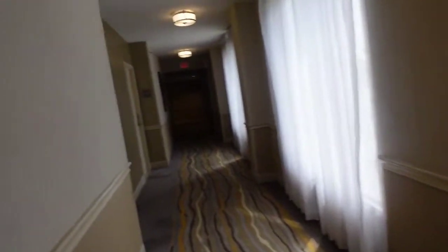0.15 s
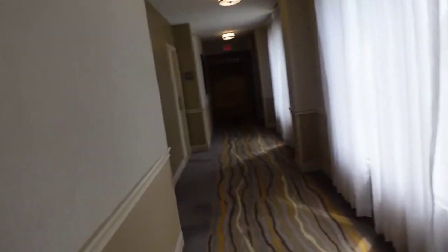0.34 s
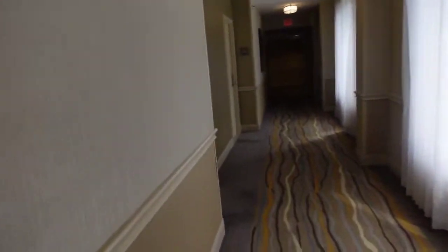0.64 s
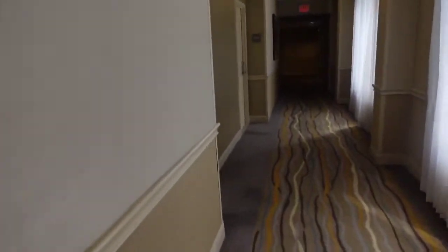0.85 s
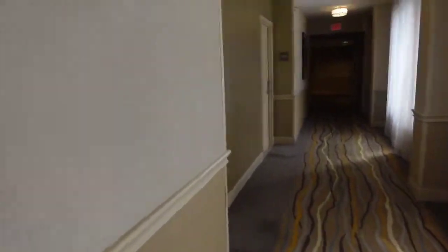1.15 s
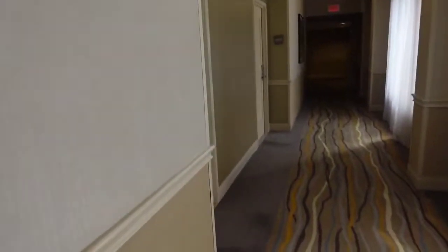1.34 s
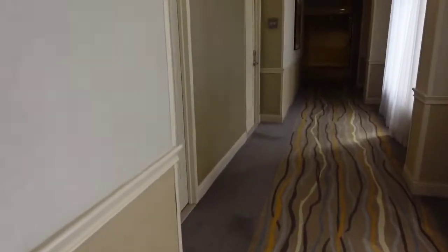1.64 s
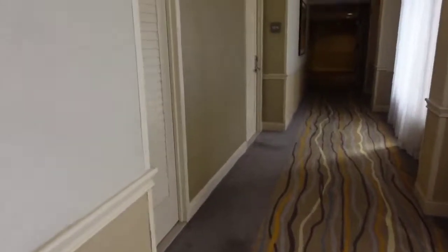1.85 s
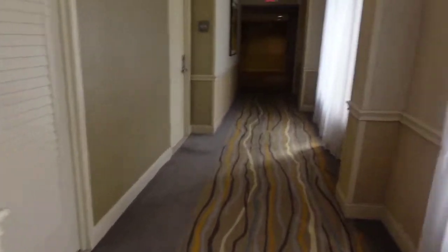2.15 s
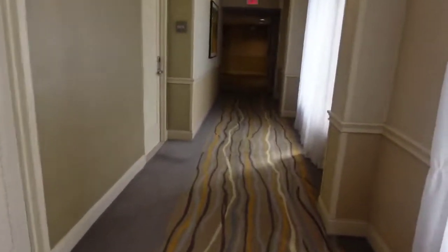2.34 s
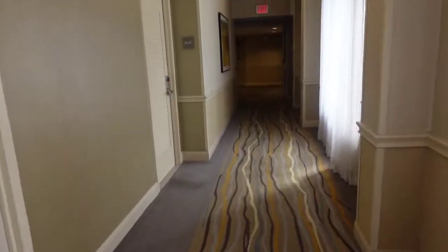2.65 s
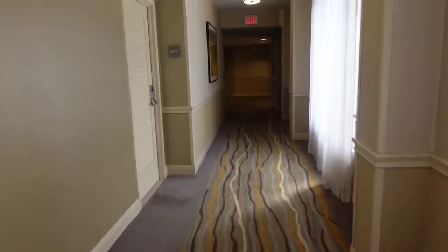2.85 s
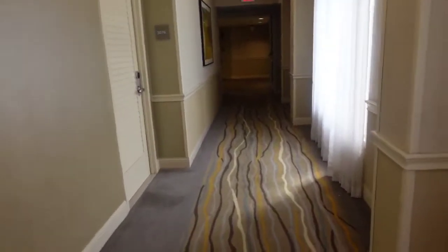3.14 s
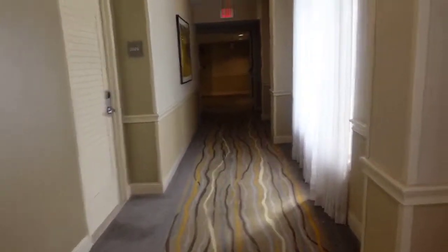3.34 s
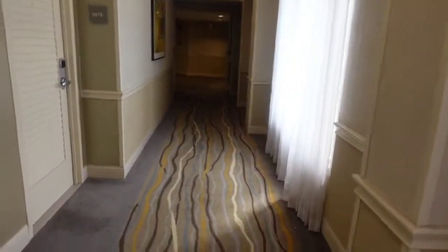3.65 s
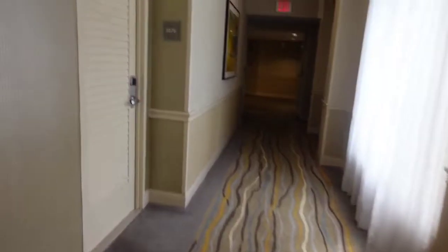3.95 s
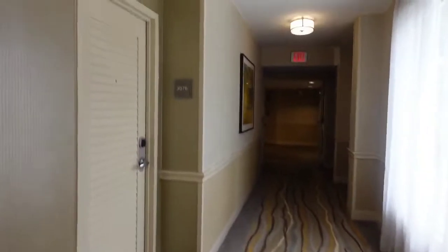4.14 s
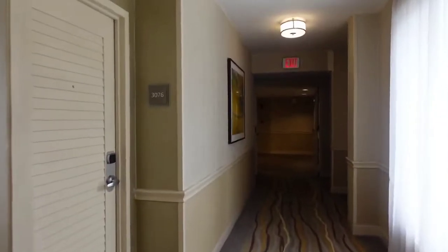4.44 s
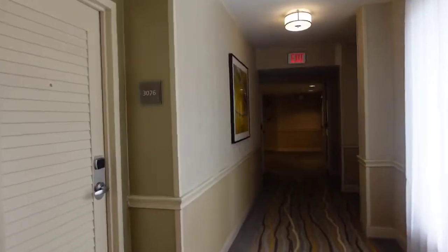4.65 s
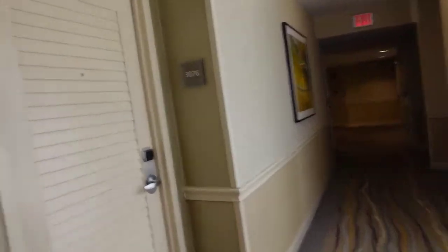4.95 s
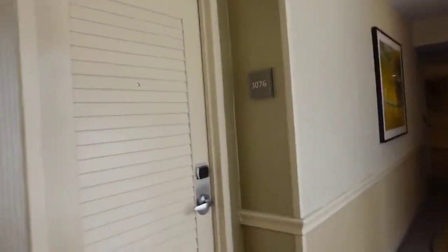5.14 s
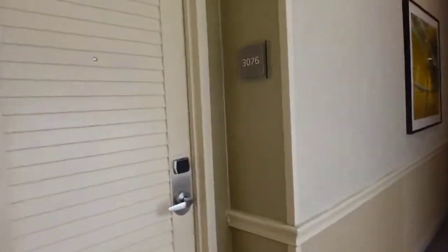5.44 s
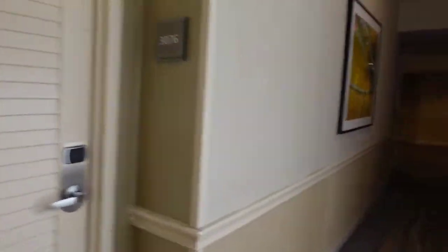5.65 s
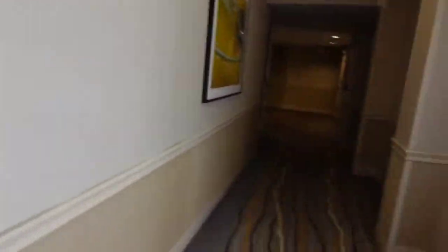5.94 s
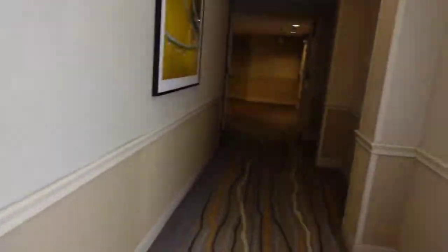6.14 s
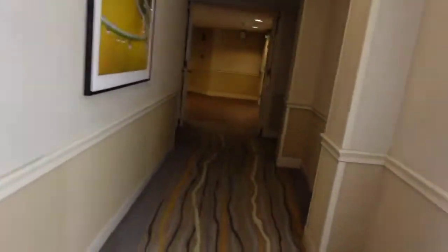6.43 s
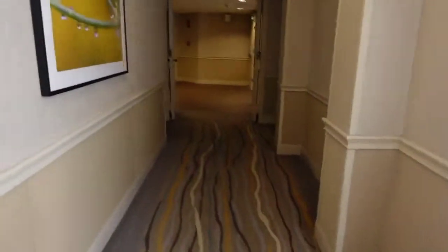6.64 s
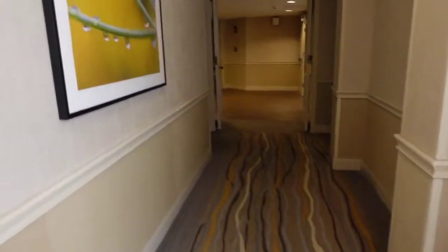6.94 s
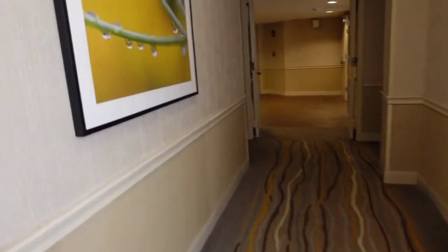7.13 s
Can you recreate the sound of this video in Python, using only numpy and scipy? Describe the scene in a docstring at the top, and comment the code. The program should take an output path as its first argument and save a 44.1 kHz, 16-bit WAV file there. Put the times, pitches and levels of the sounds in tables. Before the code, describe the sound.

Loose sandals slap at a steady walk along a carpeted corridor, with trousers swishing over a soft hiss of air.

```python
"""A carpeted corridor, along which someone walks in loose sandals, a little over two steps a second.
Each sole strikes the heel in a few quick impacts; air cavities under the foot resonate with them
and the bare walls reverberate. Straps click; there are soft low thuds and one faint handling rumble.
Between steps, friction makes noise as the other leg swings: trousers swish, the sole brushes the pile.
A soft, steady hiss of air lies beneath. The sound is close and mono."""
import sys
import numpy as np
from scipy import signal
from scipy.fft import rfft, irfft, next_fast_len
from scipy.io import wavfile
from scipy.ndimage import uniform_filter1d, map_coordinates

SR = 44100
rng = np.random.default_rng(int(sys.argv[2]) if len(sys.argv) > 2 else 0)


def transcribe(u):
    """Save the signal u as a 16-bit wav file named by the first command-line argument.

    u: samples, shape (n,) or (channels, n), limited to [-1, 1]; the rate is SR.
    q: integer samples, one column per channel.
    """
    v = np.clip(np.atleast_2d(u).T, -1, 1)
    q = np.round(v * 32767).astype(np.int16)
    wavfile.write(sys.argv[1], SR, q)


N = 321474


def amp(db):
    """Amplitude ratio of a level in decibels."""
    return 10 ** (np.asarray(db) / 20)


def unit(x):
    """Normalisation to an rms of 1."""
    return x / np.sqrt(np.mean(x ** 2) + 1e-20)


def along(points, hz):
    """Interpolation of (f/Hz, value) points on a log-frequency axis."""
    f, values = np.transpose(points)
    return np.interp(np.log(hz + 1), np.log(f), values)


def bell(hz, centre, octaves):
    """Gaussian of height 1 in log frequency, with standard deviation octaves."""
    return np.exp(-.5 * (np.log2((hz + 1) / centre) / octaves) ** 2)


def wobble(rate):
    """Smooth random modulation, rate knots a second."""
    knots = rng.standard_normal(int(N * rate / SR) + 4)
    return map_coordinates(knots, [np.arange(N) * rate / SR])


def coloured(x, level):
    """Minimum-phase filtering of x with a gain in dB of level(f/Hz)."""
    m = 2 * next_fast_len(len(x))
    cepstrum = irfft(np.log(amp(level(np.fft.rfftfreq(m, 1 / SR))) + 1e-6))
    cepstrum[1:m // 2] *= 2
    cepstrum[m // 2 + 1:] = 0
    return irfft(rfft(x, m) * np.exp(rfft(cepstrum)))[:len(x)]


def add(track, start, sound):
    """Superposition of a sound on the track from start/s on."""
    part = track[round(start * SR):][:len(sound)]
    part += sound[:len(part)]


# Spectrum of the hiss: f/Hz, relative level/dB
AIR_SPECTRUM = [(25, -35), (100, -22), (250, -10), (400, -4.5), (750, -5), (1300, 1), (2100, -8.5),
                (3200, -8), (5500, -10), (8000, -11), (15000, -17.5)]

def air(db):
    """Stationary broadband noise: ventilation and microphone hiss."""
    return amp(db) * unit(coloured(rng.standard_normal(N), lambda hz: along(AIR_SPECTRUM, hz)))


def friction(spectrum, grain_db, grain_rate):
    """Stick-slip friction: fibres catch and let go in a hiss of uneven grains, rms 1."""
    grains = rng.standard_normal(N) * amp(grain_db * wobble(grain_rate))
    return unit(coloured(grains, lambda hz: along(spectrum, hz)))


# Spectra of sole on pile and of cloth on cloth: f/Hz, relative level/dB
BRUSH_SPECTRUM = [(60, -49), (150, -18), (260, -9), (380, -12.5), (650, -6), (950, 0), (1300, 4),
                  (1700, -1.5), (2500, -13), (8000, -70)]
CLOTH_SPECTRUM = [(500, -23), (1300, -8.5), (1800, 3), (2500, 2.5), (3600, 0), (5500, 0.5), (8000, -4.5),
                  (12000, -9), (15000, -10.5)]
# Rustle of clothes that never quite come to rest: t/s, relative level/dB
CLOTHES_RUSTLE = [(0, -59.5), (.4, -58), (.95, -62), (2.3, -61), (3, -58.5), (4.3, -58.5), (4.8, -57.5),
                  (5.75, -55.5), (6.05, -56), (6.55, -62.5), (7.2, -52.5)]
# Swings of the leg: start t/s, relative swish level/dB, relative brush level/dB
LEG_SWINGS = [(0, -64, -62.5), (.2, -57.5, -69), (.47, -68, -59.5), (1.015, -56, -70), (1.53, -64, -89),
              (1.87, -56.5, -79), (2.4, -52, -64), (2.86, -58.5, -67), (3.27, -59.5, -61.5),
              (3.755, -57, -74), (4.19, -69, -82), (4.643, -50.5, -56.5), (5.144, -52.5, -59),
              (5.52, -63, -67), (6.099, -53, -57), (6.65, -57.5, -60), (7.06, -55.5, -61.5)]

def leg_swings(gain_db, uneven_db):
    """Sliding friction: the trouser legs catch, slide and part while the sole brushes the pile."""
    attack_s, hold_s, fade_db_per_s = 0.016, 0.054, 46
    t = np.arange(SR) / SR
    stroke = np.minimum(t / attack_s, 1) * amp(-fade_db_per_s * np.maximum(t - attack_s - hold_s, 0))
    swish, brush = np.zeros(N), np.zeros(N)
    for start, swish_db, brush_db in LEG_SWINGS:
        add(swish, start, amp(swish_db) * stroke)
        add(brush, start, amp(brush_db) * stroke)
    rustle = amp(np.interp(np.arange(N) / SR, *np.transpose(CLOTHES_RUSTLE)))
    cloth = np.hypot(swish, rustle) * amp(uneven_db * wobble(30))  # incoherent sources add in power
    pile = brush * friction(BRUSH_SPECTRUM, grain_db=1.5, grain_rate=120)
    trousers = cloth * friction(CLOTH_SPECTRUM, grain_db=0.9, grain_rate=600)
    return amp(gain_db) * (pile + trousers)


# Reverberation time of the corridor: f/Hz, T60/s
CORRIDOR_T60 = [(150, 0.81), (300, 0.95), (1300, 0.76), (5000, 0.51), (12000, 0.38)]

def reverberation(build_s, liveness=1):
    """Dense wall reflections build up, then decay exponentially, the treble first."""
    hz, t, spectra = signal.stft(rng.standard_normal(SR), SR, nperseg=256)
    t60 = liveness * along(CORRIDOR_T60, hz)[:, None]
    tail = signal.istft(spectra * amp(-60 * t / t60), SR)[1][:SR]
    return tail * (1 - np.exp(-np.arange(SR) / SR / build_s))


# Ticks, rebounds and knocks: t/s, level/dB, centre f/Hz, half the bell's deviation/octaves, T60/s
SANDAL_TICKS = [(.204, -43, 1730, .8, .05), (0.3221, -39.5, 4000, 2.1, .03), (.683, -42, 5200, .3, .023),
                (0.772, -37.5, 3180, 2.8, 0.021), (0.793, -37.5, 6000, 1.1, 0.014),
                (1.249, -33.5, 2500, 1.56, 0.016), (1.266, -39, 2000, 1.9, .013),
                (2.422, -32, 2600, 0.78, 0.012), (2.941, -35.5, 4270, 0.31, 0.02),
                (3.352, -54, 9000, 1, .044), (3.436, -30.5, 790, 0.56, 0.028),
                (4.657, -39.5, 2780, 0.58, .063), (5.076, -33.5, 850, 0.5, 0.029),
                (5.5281, -35, 1570, 0.52, 0.027), (5.765, -45.5, 6000, 1.8, 0.042)]

def ticks(room_db):
    """Damped transients: straps click and soles knock lightly, each with faint reverberation."""
    out = np.zeros(N)
    t = np.arange(SR) / SR
    for start, db, centre_hz, octaves, t60 in SANDAL_TICKS:
        click = rng.standard_normal(SR) * amp(-60 * t / t60)
        click += amp(room_db) * reverberation(build_s=0.0014)
        tone = lambda hz: 30 * (bell(hz, centre_hz, 2 * octaves) - 1) + along([(60, 8), (200, 2.5)], hz)
        add(out, start, amp(db) * coloured(click, tone))
    return out


# Soles scuffing the pile; soft low thuds, and one faint rumble (90 Hz) of the microphone being handled:
# middle t/s, peak level/dB, 1/e half-length t/s, centre f/Hz
PILE_SCUFFS = [(.28, -60, 0.026, 2410), (1.11, -61, 0.079, 2300), (2.42, -56, 0.017, 2390),
               (2.48, -54, .03, 2490), (4.71, -57.5, 0.1, 2630), (5.785, -54, 0.033, 2500),
               (6.69, -57, 0.039, 2070), (6.925, -53.5, 0.079, 2430), (7.235, -54, 0.022, 1800)]
LOW_THUDS = [(.38, -63.5, 0.067, 390), (.705, -74, .042, 90), (2.49, -59, 0.033, 495),
             (5.92, -64.5, .035, 348), (6.115, -65.5, 0.05, 298), (7.235, -61, 0.024, 327)]

def soft_contacts(rows, octaves, grain_db):
    """Compliant contact has no sharp attack: a band of noise swells under a Gaussian envelope."""
    out = np.zeros(N)
    t = (np.arange(SR // 2) - SR // 4) / SR
    for middle, db, half_length, centre_hz in rows:
        grains = rng.standard_normal(len(t)) * amp(grain_db * wobble(303.3)[:len(t)])
        band = unit(coloured(grains, lambda hz: 50 * bell(hz, centre_hz, octaves)))
        add(out, middle + t[0], amp(db) * band * np.exp(-(t / half_length) ** 2))
    return out


def burst(decay_s, spiky_db):
    """Exponentially decaying random impulses, energy 1; spiky_db makes a few stand out."""
    count = SR // 50
    grains = rng.standard_normal(count)
    grains *= amp(spiky_db * unit(uniform_filter1d(rng.standard_normal(count), size=16)))
    crackle = grains * np.exp(-np.arange(count) / SR / decay_s)
    return crackle / np.linalg.norm(crackle)


# Contacts within one snap: mean delay t/s, relative level/dB
SNAP_CONTACTS = [(0, -1.5), (.003, -5), (.0062, -11)]
# Tilt of the direct sound, brighter than its echoes: f/Hz, gain/dB
DIRECT_TILT = [(200, -3), (1400, -6.5), (3500, -4.5), (6000, -1), (10000, 0), (14000, 3)]

def slap(lead_s, snap_db, touch_db):
    """Multiple impact: the sole's edge touches first, then the rest snaps shut patch by patch."""
    out = np.zeros(SR)
    add(out, lead_s - 0.0042, amp(touch_db) * burst(decay_s=0.0013, spiky_db=5))
    for delay, db in SNAP_CONTACTS:
        start = lead_s + delay * (1 + 0.2 * rng.uniform(-1, 1))
        add(out, start, amp(snap_db + db + rng.standard_normal()) * burst(decay_s=0.0015, spiky_db=3))
    return coloured(out, lambda hz: along(DIRECT_TILT, hz))


def scattered(x, db, decay_s):
    """Interference: faint reflections from legs, skirting and door frames ripple the spectrum."""
    response = amp(db) * burst(decay_s, spiky_db=-3)
    response[0] += 1
    return signal.fftconvolve(x, response)[:len(x)]


# Tone common to all slaps: f/Hz, gain/dB
SOLE_RESPONSE = [(140.0, -13), (250.0, 0.9), (350.0, 5.5), (600.0, 2.5), (900.0, 5.5), (1300.0, 14),
                 (2000.0, 8.5), (2800.0, 7.5), (3600.0, 5), (5000.0, 8), (7000.0, 6.5), (9000.0, 4.5),
                 (15000.0, 0)]
# Doors and curtains along the way change the reverberation: t/s, factor on T60
ROOM_LIVENESS = [(.3, 1.5), (.8, 0.8), (1.6, 1.07), (3, 0.82), (3.5, 1.06), (4.9, 0.99), (6.3, 0.84),
                 (6.8, 0.88)]
# Slaps, all levels relative: t/s, level/dB, snap/dB, thud/dB, cupped clop/dB, air pocket/dB,
# pocket f/Hz, smack/dB, lower gap f/Hz, upper gap f/Hz, sizzle/dB, echo build-up t/s
SANDAL_STEPS = [(0.3381, -53.5, 9, 1, -1.5, 8, 1840, 4.5, 2770, 6400, 3, 0.0026),
                (0.7527, -46, 1.5, -0.5, 2.5, 6, 1260, 9.5, 3850, 5770, -1.5, 0.014),
                (1.233, -44.5, 2.5, -1.5, -2, 8, 1800, 6.5, 4640, 6350, -2.5, 0.017),
                (1.637, -47.5, -2, 3.5, 0, 5, 1390, 4.5, 5370, 6200, 3.5, .003),
                (2.1127, -46, 6, 2.5, 2, 2.5, 1560, 7.5, 4720, 6160, 2.5, 0.011),
                (2.544, -46.5, 3, 3, 3.5, 5, 1550, 4.5, 4350, 5560, 3.5, 0.0028),
                (3.0253, -43.5, -1, -7, 10, 1.5, 1320, 5.5, 2170, 5160, 0.5, 0.0044),
                (3.488, -43.5, 5.5, 3, 2, 4.5, 1360, 5, 3840, 5900, 3.5, 0.0061),
                (3.9454, -43.5, 4.5, 4.5, 1.5, 4, 1505, 5, 4900, 6970, 0.5, 0.0076),
                (4.3723, -45.5, 4.5, 4.5, -.5, 6, 1500, 5.5, 5340, 9940, -3.5, 0.0087),
                (4.878, -43, 5.5, 1, 4, 3, 1270, 4.5, 2780, 6300, -1.5, 0.0045),
                (5.35, -52, 7, 1.5, 0, 7, 1570, 7.5, 4900, 6230, 2.5, 0.0017),
                (5.8217, -43, 3.5, 0.5, 0, 1, 1100, 6, 5070, 5750, 0.5, 0.0047),
                (6.321, -43.5, -8, 1.5, 0, 4, 1650, 6, 5040, 10750, -2.5, 0.0017),
                (6.8016, -43, 0, -0.5, 4.5, 2, 1710, 6, 4900, 7200, -.5, 0.0053),
                (7.2585, -42.5, 1, 1, 1.5, 6, 1280, 4.5, 2110, 6020, 0, 0.004)]

def steps(direct_db, edge_db, room_db, squeeze_db, push_db):
    """Cavity resonance: each slap and its echoes take the tone of the air pockets the foot closes."""
    lead_s, squeeze_s, push_s = 0.02, 0.0032, 0.0025
    pocket_octaves, gap_octaves = 0.28, 0.085
    out = np.zeros(N)
    t = np.arange(SR) / SR - lead_s
    push = amp(push_db) * t / push_s * np.exp(-(t / push_s) ** 2)  # low pulse of the foot's weight
    for (when, db, snap_db, thud_db, clop_db, pocket_db, pocket_hz,
         smack_db, lower_hz, upper_hz, sizzle_db, build_s) in SANDAL_STEPS:
        touch_db = edge_db + 0.22 * snap_db  # the edge lands harder before a hard snap
        blow = slap(lead_s, snap_db + direct_db, touch_db)
        # Air is squeezed out around the moment of contact.
        blow += amp(squeeze_db) * rng.standard_normal(SR) * np.exp(-abs(t) / squeeze_s)
        liveness = np.interp(when, *np.transpose(ROOM_LIVENESS))
        add(blow, lead_s, amp(room_db) * reverberation(build_s, liveness))
        blow = scattered(blow, db=-10.5, decay_s=0.0063)

        def resonances(hz):
            """Gain/dB of the foot's body, the hollow under the arch and two narrow gaps at the heel."""
            sole = along(SOLE_RESPONSE, hz) + along([(50, -45), (140, -1)], hz)
            body = sole + thud_db * bell(hz, 265, 0.94) + sizzle_db * bell(hz, 10900, 0.39)
            hollow = clop_db * bell(hz, 710, 0.43) + pocket_db * bell(hz, pocket_hz, pocket_octaves)
            gaps = smack_db * (bell(hz, lower_hz, gap_octaves) + bell(hz, upper_hz, gap_octaves))
            return body + hollow + gaps

        add(out, when - lead_s, amp(db) * (coloured(blow, resonances) + push))
    return out


def scene():
    """Superposition of all the sources, the same in both channels."""
    mono = steps(direct_db=24, edge_db=19.3, room_db=0.5, squeeze_db=-1, push_db=-27)
    mono += ticks(room_db=-16)
    mono += soft_contacts(PILE_SCUFFS, octaves=0.68, grain_db=0.5)
    mono += soft_contacts(LOW_THUDS, octaves=1.23, grain_db=0)
    mono += leg_swings(gain_db=-2, uneven_db=1.84)
    mono += air(db=-62)
    return np.array([mono, mono])


def record(dry):
    """Band limiting: an ideal low-pass filter removes the highest treble."""
    cutoff_hz = 15250
    m = next_fast_len(N + SR // 2)
    passband = np.fft.rfftfreq(m, 1 / SR) < cutoff_hz
    return irfft(rfft(dry, m) * passband, m)[:, :N]


dry = scene()
out = record(dry)
transcribe(out)
```